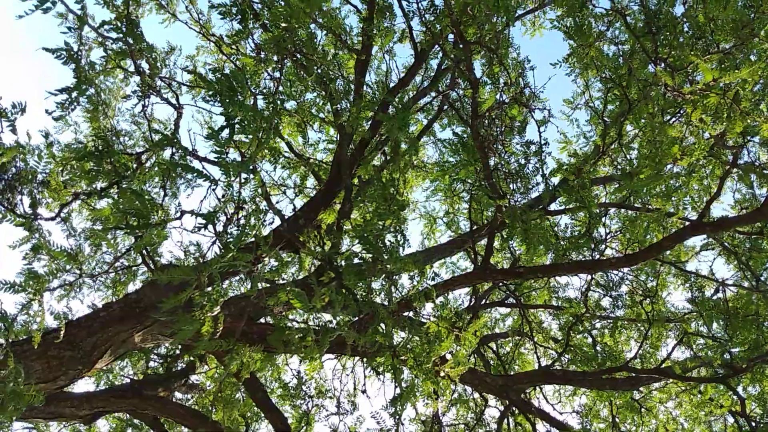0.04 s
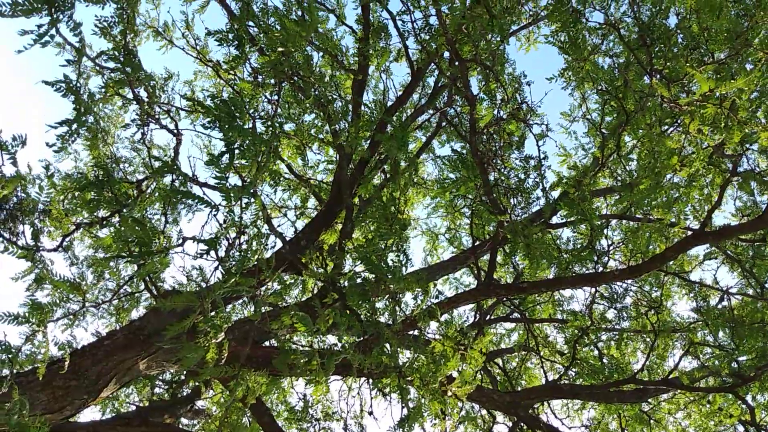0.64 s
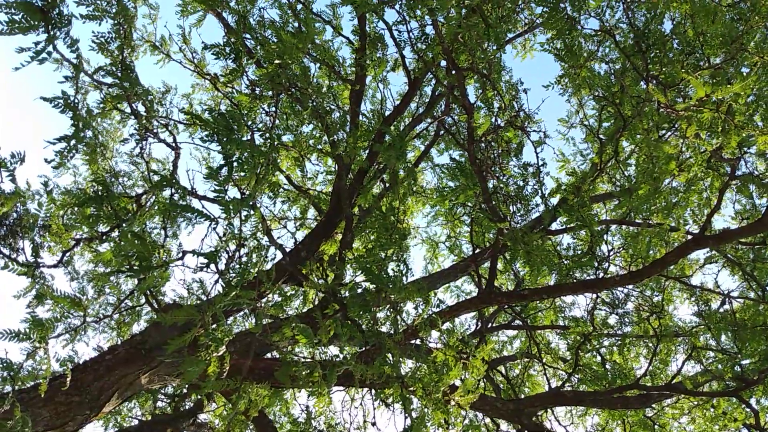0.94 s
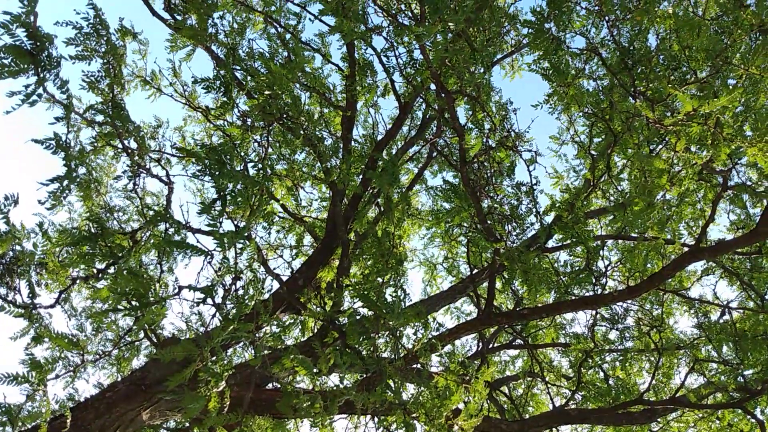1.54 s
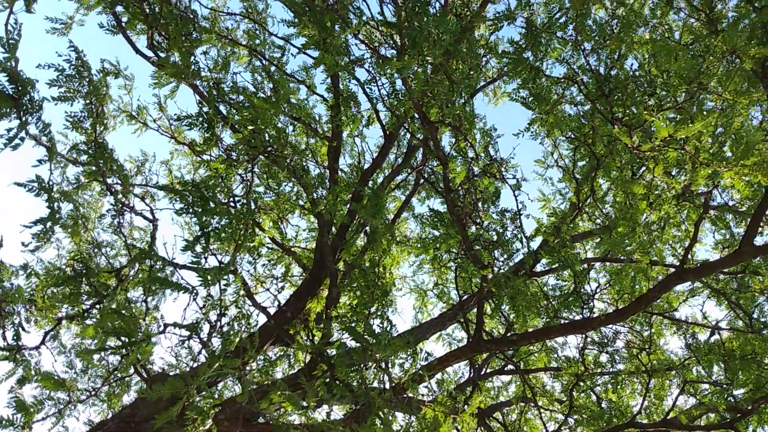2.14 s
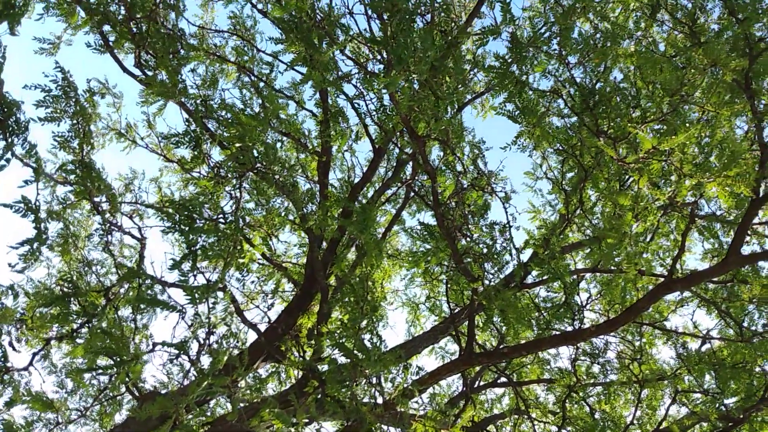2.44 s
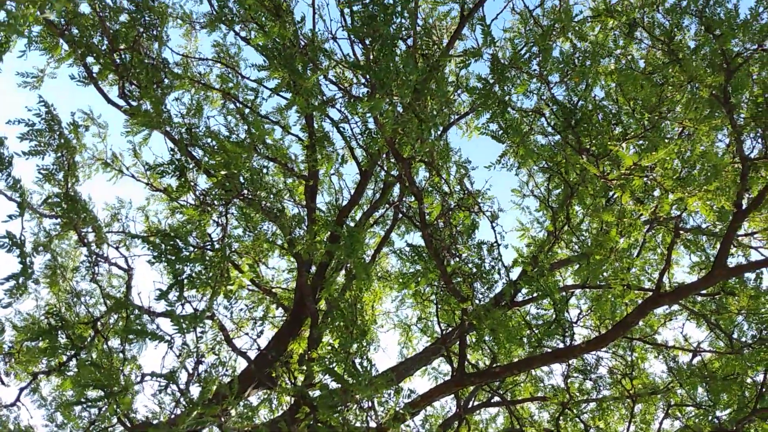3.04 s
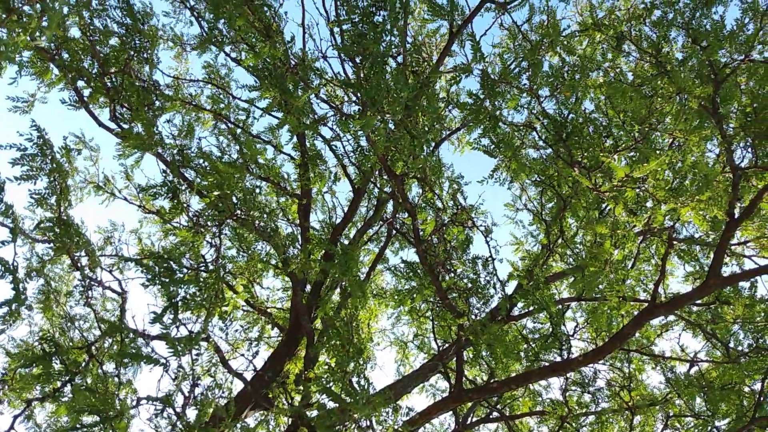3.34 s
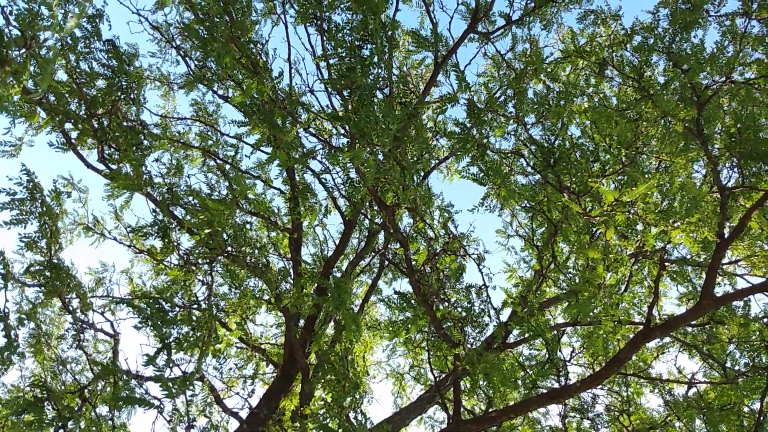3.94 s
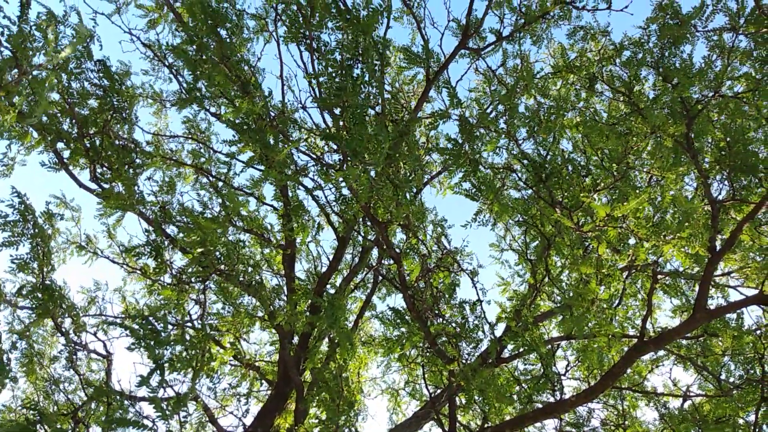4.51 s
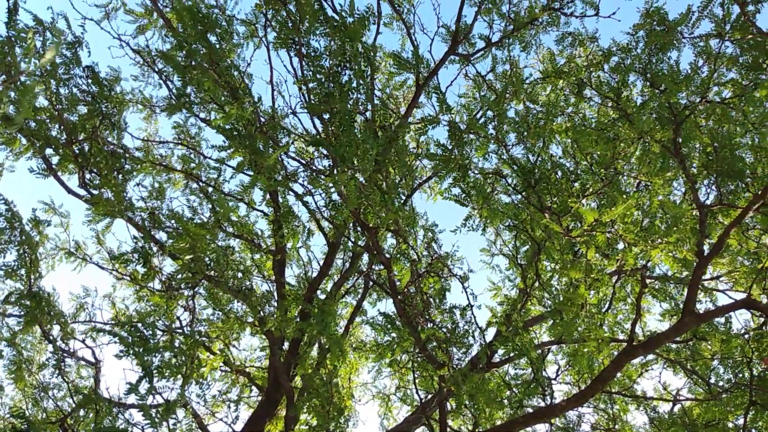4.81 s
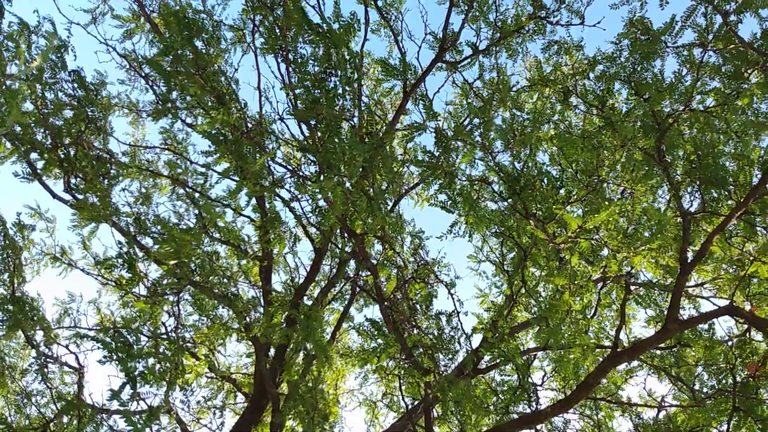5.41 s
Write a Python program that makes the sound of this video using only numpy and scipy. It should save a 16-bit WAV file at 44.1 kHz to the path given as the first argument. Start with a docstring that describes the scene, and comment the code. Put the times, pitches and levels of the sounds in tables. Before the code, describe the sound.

The sound is heard outdoors from beneath a tree. It opens quietly with a low wind rumble, a faint low electronic hum and the hiss of distant cicadas, while one cicada buzzes softly overhead, to the right, creeping up in level. At about 1.3 seconds this buzz swells, and the wind, hum and distant cicadas get louder together. By about 2.5 to 3 seconds the near cicada has reached a hard, bright, steady song, high and finely rasping, far louder than everything else. Its tone colour shifts from about 2 seconds on, as if the listener were moving among echoes from the branches. From about 3.6 seconds it slowly becomes a little quieter and duller, still buzzing at the end, around 5.5 seconds. A bird gives very faint, short chips, around 2, 3.5 and 4.7 seconds.

```python
"""Low wind, a faint low hum and the hiss of distant cicadas come first, under a soft buzz overhead. That buzz
is a cicada in a tree: it winds up, swells to a hard, steady song, holds it and eases a little. Its tymbals, two
ribbed drum skins, buckle about 180 times a second and make its abdomen ring; the buzz's peaks shift as the
listener moves among the echoes. Two more cicadas sing and a bird chips. Wind, hum and distant cicadas get
louder together as the microphone's gain comes up."""
import sys
import numpy as np
from scipy import signal
from scipy.fft import rfft, irfft, next_fast_len
from scipy.io import wavfile
from scipy.ndimage import map_coordinates

SR = 44100
rng = np.random.default_rng(int(sys.argv[2]) if len(sys.argv) > 2 else 0)


def wav_out(sig):
    """Save sig, one row per channel (or a flat mono array), as 16-bit PCM at SR to the path in sys.argv[1]."""
    wavfile.write(sys.argv[1], SR, np.round(np.clip(np.atleast_2d(sig).T, -1, 1) * 32767).astype(np.int16))


N = 250047
TOP_HZ = 15600  # the highest pitch heard
GAIN_AT_S, GAIN_RISE_S = 1.35, 0.29  # the background gets louder as the microphone's gain comes up


def amp(db):
    """Turns decibels into a number to multiply by."""
    return 10 ** (np.asarray(db) / 20)


def unit(x):
    """Scales a sound to an average (rms) strength of 1."""
    return x / np.sqrt(np.mean(x ** 2) + 1e-20)


def along(points, hz):
    """Reads a curve through (f/Hz, value) points, joined on a log pitch axis."""
    f, v = np.transpose(points)
    return np.interp(np.log(hz + 1), np.log(f + 1), v)


def lift(resonances, hz):
    """The dB that bell-shaped peaks and hollows add at each pitch."""
    return sum(db * np.exp(-((hz - centre) / width) ** 2) for centre, width, db in resonances)


def since(start_s):
    """Seconds gone by since a moment, 0 before it."""
    return np.maximum(np.arange(N) / SR - start_s, 0)


def ramp(start_s, length_s):
    """A straight climb from 0 to 1."""
    return np.minimum(since(start_s) / length_s, 1)


def swell(start_s, rise_s):
    """A rise from 0 that levels off towards 1."""
    return 1 - np.exp(-since(start_s) / rise_s)


def wobble(rate):
    """A smooth curve through `rate` random values a second."""
    return map_coordinates(rng.standard_normal(int(N * rate / SR) + 4), [np.arange(N) * rate / SR])


def filtered(x, response):
    """Scales and delays each pitch in x as response(hz) says."""
    size = next_fast_len(N + SR // 4)
    return irfft(rfft(x, size) * response(np.fft.rfftfreq(size, 1 / SR)), size)[..., :N]


def panned(x, balance):
    """Leans each pitch left or right by (f/Hz, left minus right/dB) points."""
    return filtered(x, lambda hz: amp(np.outer([.5, -.5], along(balance, hz))))


def pulses(rate_hz, jitter_s, scatter_db):
    """One sharp pulse a cycle, each slightly off in time and size."""
    cycle = np.cumsum(rate_hz) / SR
    at = np.interp(np.arange(1, int(cycle[-1])), cycle, np.arange(N))
    late, size = rng.standard_normal((len(at), 2)).T
    at = (at + late * jitter_s * SR)[:, None]
    # each pulse is drawn over 16 samples, so it can fall between two of them
    taps = np.floor(at).astype(int) + np.arange(-7, 9)
    shape = np.sinc(taps - at) * np.cos(np.pi * (taps - at) / 16) ** 2
    clicks = shape * amp(scatter_db * size)[:, None]
    return np.bincount(np.clip(taps, 0, N - 1).ravel(), clicks.ravel(), N)


def canopy(x, echo_s, sway_rate, paths=4):
    """Stereo echoes off leaves and branches; the paths take turns as they sway."""
    t = np.arange(SR // 4) / SR
    tails = rng.standard_normal((paths, 2, len(t))) * amp(-60 * t / echo_s)
    tails /= np.linalg.norm(tails, axis=-1, keepdims=True)
    shares = np.array([wobble(sway_rate) for _ in tails])
    shares /= np.sqrt(np.sum(shares ** 2, axis=0) + 0.47)
    echoes = (signal.oaconvolve(x[None], tail, axes=1)[:, :N] for tail in tails)
    return sum(share * echo for share, echo in zip(shares, echoes))


# how strong the wind is at each pitch: f/Hz, level/dB
WIND_TONE = [(24, -54), (40, -7), (72, 1), (100, -6.5), (126, -2), (177, -10), (202, -12.5), (239, -7.5),
             (268, -16), (349, -14), (508, -18), (1040, -19), (1460, -22.5), (2050, -29.5), (2980, -29),
             (3600, -34), (4680, -38), (7920, -120)]
# how alike it sounds on the left and right: f/Hz, likeness (1 = the same)
WIND_LIKENESS = [(60, 0.96), (150, 0.95), (300, 0.86), (600, 0.76), (1200, 0.13), (3000, 0)]


def wind():
    """Moving air rumbles softly, alike on both sides in the bass."""
    def tone(hz):
        angle = np.arccos(np.clip(along(WIND_LIKENESS, hz), -1, 1)) / 2
        return amp(along(WIND_TONE, hz)) * [np.cos(angle), np.sin(angle)]

    shared, opposite = filtered(rng.standard_normal((2, N)), tone)
    return unit(np.array([shared + opposite, shared - opposite])) * amp(0.47 * wobble(5.75))


# the two notes of the low hum: f/Hz, level against the wind/dB
HUM_NOTES = [(86.1, -14.5), (172.3, -14)]


def low_hum():
    """A faint, steady, low hum."""
    hum = np.zeros(N)
    for hz, db in HUM_NOTES:
        pitch_hz = hz + 1.22 * wobble(5)
        hum += amp(db) * unit(np.sin(2 * np.pi * np.cumsum(pitch_hz) / SR))
    return hum


# the low background leans left in the bass and right higher up: f/Hz, left minus right/dB
LOW_BALANCE = [(300, 1.5), (700, 1.5), (1400, -3), (3000, 0)]


def low_background(start_db=-66.5, gain_db=7.5):
    """Wind and hum, both louder once the microphone's gain comes up."""
    level_db = start_db + gain_db * swell(GAIN_AT_S, GAIN_RISE_S)
    return amp(level_db) * panned(wind() + low_hum(), LOW_BALANCE)


# the bird's faint calls: t/s, level/dB, f/Hz
BIRD_CHIPS = [(0.08, -84, 3300), (0.526, -80, 3370), (2.018, -74, 3360), (3.429, -72.5, 3400),
              (3.497, -77, 2980), (4.687, -74, 2930), (4.706, -69, 3420)]


def bird(width_s=0.0162, arch_hz=240):
    """Short ragged chips that arch up in pitch and fall, blurred by the trees."""
    t = np.arange(N) / SR
    chips = np.zeros(N)
    for start_s, db, hz in BIRD_CHIPS:
        from_peak = (t - start_s - width_s / 2) / width_s
        pitch_hz = hz - arch_hz * np.tanh(from_peak) ** 2 + 120 * wobble(400)
        chips += amp(db) * np.exp(-from_peak ** 2 / 2) * np.sin(2 * np.pi * np.cumsum(pitch_hz) / SR)
    return amp(-.5) * chips + amp(.5) * canopy(chips, echo_s=0.057, sway_rate=0.74)


# two cicadas each slow down once: first f/Hz, last f/Hz, middle of the drop t/s, its time scale/s
NEIGHBOUR_BEATS = [(201, 197, 3.0, .16), (189.4, 186.9, 2.07, .07)]
# one gets quieter as it slows, the other louder: level before/dB, level after/dB
NEIGHBOUR_LEVELS = [(-4.5, -12), (-16, -7)]
# the pitches at which they ring: f/Hz, width/Hz, boost/dB
NEIGHBOUR_PEAKS = [(4620, 60, 8.5), (5830, 80, 5.5), (6930, 87, 3.5), (8030, 93, 4), (8830, 42, 7.5),
                   (9170, 80, 8)]


def neighbours():
    """Two cicadas heard through the leaves, both beating faster than the near one."""
    pair = np.zeros((2, N))
    for beats, (first_db, last_db) in zip(NEIGHBOUR_BEATS, NEIGHBOUR_LEVELS):
        first_hz, last_hz, drop_at_s, drop_s = beats
        dropped = (1 + np.tanh((since(0) - drop_at_s) / (2 * drop_s))) / 2
        rate_hz = first_hz + (last_hz - first_hz) * dropped + 0.0812 * wobble(7)
        beat = pulses(rate_hz, jitter_s=3e-6, scatter_db=2.0)
        level_db = first_db + (last_db - first_db) * dropped + 1.34 * wobble(14)
        pair += amp(level_db) * unit(canopy(beat, echo_s=0.16, sway_rate=8, paths=6))
    return filtered(pair, lambda hz: amp(lift(NEIGHBOUR_PEAKS, hz)))


# how strong the distant cicadas are at each pitch: f/Hz, level/dB
DISTANT_TONE = [(2500, -50), (4300, -31), (4750, -21.5), (5300, -10.5), (5800, -9), (6900, -4), (7900, -5),
                (9100, -11), (10000, -11.5), (11700, -16), (12800, -24), (15500, -30)]


def distant_cicadas(start_db=-63, gain_db=8):
    """The two neighbours and a far chorus blurred to a hiss, a little to the right."""
    pair = neighbours()
    chorus = amp(-11.5 + .8 * wobble(12)) * rng.standard_normal((2, N))
    far = unit(filtered(pair + chorus, lambda hz: amp(along(DISTANT_TONE, hz))))
    level_db = start_db + gain_db * swell(GAIN_AT_S, GAIN_RISE_S)
    return amp(level_db + np.array([[-2.5], [2]])) * far


def buckling(hz, lasts_s=.0013, ripple_s=0.00034, ripple_hz=2250):
    """A tymbal's ribs give way one after another, so each pitch of a snap leaves at its own moment."""
    delay_s = lasts_s * (1 - hz / TOP_HZ) + ripple_s * np.sin(2 * np.pi * hz / ripple_hz)
    return np.exp(-2j * np.pi * np.cumsum(delay_s) * hz[1])


# the four snaps within one cycle: t/s, level/dB
CYCLE_SNAPS = [(0, 2), (.00105, -.6), (.0023, 2.2), (.00355, -0.1)]
# their rasp is strongest in the middle of the song's range: f/Hz, level/dB
RASP_TONE = [(4500, -20), (6000, -4), (7000, 0), (9000, -3), (12500, -12)]


def tymbals(wound_up, start_hz=176.8, song_hz=180, rasp_db=-20):
    """Two tymbals snap in and out once a cycle; the beat speeds up, quickly at first, then holds."""
    def four_snaps(hz, notch=0.15):  # notch, 0 to 1: how deeply the snaps cancel at some pitches
        total = sum(amp(db) * np.exp(-2j * np.pi * hz * delay_s) for delay_s, db in CYCLE_SNAPS)
        return total * (np.abs(total) + 1e-6) ** (notch - 1)

    rate_hz = start_hz + (song_hz - start_hz) * wound_up ** .52 + 0.0556 * wobble(20)
    beat = pulses(rate_hz, jitter_s=.7e-6, scatter_db=0.46)
    snaps = unit(filtered(beat, lambda hz: four_snaps(hz) * buckling(hz)))
    # the ribs never buckle twice alike: every snap carries a rasp of its own
    rasp = filtered(snaps * rng.standard_normal(N), lambda hz: amp(along(RASP_TONE, hz)))
    return snaps + amp(rasp_db) * rasp


# how strongly the abdomen sends out each pitch: f/Hz, level/dB
ABDOMEN_TONE = [(2000, -84), (3200, -33.5), (3900, -27.5), (4500, -21.5), (5200, -9), (7200, -1.23),
                (9000, -3), (10500, -6), (11700, -9), (13000, -14.5), (15500, -24.5)]
# peaks and hollows of abdomen and branches, heard throughout: f/Hz, width/Hz, boost/dB
STEADY_PEAKS = [(4420, 120, 7.5), (4650, 80, -5.5), (5230, 80, 4.5), (5610, 120, 9.8), (6350, 90, 8.1),
                (6880, 80, 3.4), (7170, 110, 6.7), (7700, 110, 8.0), (8460, 300, 5.4), (9020, 80, -4.2),
                (9170, 80, 7.4), (9840, 230, 8.1), (10850, 580, -2.6), (11690, 160, 7.4), (11870, 80, -6.4),
                (12480, 100, -7.3)]


def abdomen(snaps, colouring):
    """The snaps ring the abdomen, heard with one colouring from the echoes."""
    tone_db = lambda hz: along(ABDOMEN_TONE, hz) + lift(STEADY_PEAKS, hz) + lift(colouring, hz)
    return unit(filtered(snaps, lambda hz: amp(tone_db(hz))))


# six colourings in turn, where echoes add up or cancel: f/Hz, width/Hz, boost/dB
SWELLING_PEAKS = [(4510, 80, -15.3), (4680, 90, 8.5), (4860, 80, -14.1), (5020, 90, 5.9), (5860, 150, 15.9),
                  (6130, 80, -6.5), (6290, 80, 11.5), (6680, 1270, -8.7), (7010, 80, 12.4),
                  (9170, 130, -15.2), (9360, 90, 7.2), (9530, 80, -13.2), (10040, 200, -10.3),
                  (10800, 80, -7.9), (12570, 640, 10.8), (12790, 150, -11.3)]
CREST_PEAKS = [(4660, 780, -7.6), (5940, 90, 8.0), (6140, 150, -12.2), (6470, 90, -15.0), (7740, 80, -8.2),
               (8380, 320, -10.9), (8640, 80, 11.1), (8820, 90, -9.8), (9180, 130, -9.9), (9360, 80, 10.4),
               (9540, 90, -11.2), (9910, 160, -14.8), (10350, 300, 6.4), (12210, 150, 16.0),
               (12930, 100, 9.6), (13120, 90, -13.4)]
FULL_PEAKS = [(3920, 190, -8.5), (5100, 100, -14.9), (5950, 80, -10.6), (6250, 100, -7.8),
              (6760, 220, -9.4), (8060, 170, -16.0), (8840, 80, 6.1), (9000, 110, -8.6), (9330, 90, -5.5),
              (9720, 80, -5.0), (10600, 90, -7.4), (11160, 80, -7.1), (11890, 130, -12.9),
              (12240, 110, -12.2), (12990, 150, -10.0), (13650, 110, -14.8)]
HOLDING_PEAKS = [(4670, 80, -8.2), (5060, 80, -10.4), (5380, 110, -4.5), (5800, 200, -8.6),
                 (6680, 80, -10.1), (6840, 90, 3.1), (7000, 80, -8.3), (7530, 160, -3.4), (8720, 270, -6.4),
                 (9400, 90, -12.0), (10200, 130, -6.2), (10600, 160, -14.6), (11460, 570, -3.6),
                 (12490, 260, -11.5), (13250, 130, -16.0), (14050, 160, -6.1)]
EASING_PEAKS = [(4240, 360, -8.7), (5120, 100, 8.0), (5660, 230, -11.2), (6120, 80, -10.2),
                (6480, 80, -10.2), (7260, 130, -16.0), (7660, 140, -16.0), (8100, 80, -7.7),
                (8510, 100, -14.8), (8780, 90, -9.7), (9280, 120, -12.9), (10080, 300, -14.1),
                (11200, 210, -7.1), (12140, 100, -14.5), (12710, 220, -11.6), (14640, 110, -15.0)]
SETTLING_PEAKS = [(5040, 90, 9.4), (5390, 90, 8.6), (6140, 90, -10.1), (6300, 90, 5.9), (6480, 80, -15.3),
                  (6650, 90, 7.0), (7030, 90, 6.0), (7180, 80, -12.9), (7570, 80, -15.2), (8280, 80, 13.2),
                  (8580, 460, -7.2), (9010, 90, 10.2), (9180, 80, -12.9), (9730, 90, 5.1),
                  (10030, 180, -9.7), (14840, 100, 15.0)]
# the five fades from one colouring to the next: start t/s, length/s, level/dB
COLOUR_CHANGES = [(2.096, 0.19, 0.4), (2.39, .22, -.3), (3.5, 0.96, 0), (4.62, 0.26, -1),
                  (5.08, 0.32, 0.54)]


def shifting_colour(snaps):
    """The buzz's peaks shift as the listener moves among the echoes."""
    song = abdomen(snaps, SWELLING_PEAKS)
    colourings = [CREST_PEAKS, FULL_PEAKS, HOLDING_PEAKS, EASING_PEAKS, SETTLING_PEAKS]
    for (start_s, length_s, db), colouring in zip(COLOUR_CHANGES, colourings):
        song = song + ramp(start_s, length_s) * (amp(db) * abdomen(snaps, colouring) - song)
    return song


EASE_AT_S = 3.58  # from here the near song slowly gets quieter and duller


def brightness(song, wound_up, slack_db=-3.5, taut_db=2.5, dull_db_per_s=2):
    """Harder snaps are brighter: the treble grows as the tymbals wind up and dulls as they ease."""
    treble = filtered(song, lambda hz: along([(9500, 0.24), (11500, 0.63)], hz))
    treble_db = slack_db + (taut_db - slack_db) * wound_up - dull_db_per_s * since(EASE_AT_S)
    waver_db = 0.6 * wobble(13)
    return song + (amp(treble_db + waver_db) - 1) * treble


def effort(start_db=-70.5, creep_db_per_s=5.5, swell_at_s=1.28, full_db=-43, ease_db_per_s=1.5):
    """The near cicada's level in dB: it creeps up, swells to full song, holds and eases."""
    quiet_db = start_db + creep_db_per_s * np.minimum(since(0), swell_at_s)
    swell_db = (full_db - quiet_db) * swell(swell_at_s, rise_s=0.57)
    return quiet_db + swell_db - ease_db_per_s * since(EASE_AT_S) + 0.084 * wobble(5.1)


def near_branches(hz, lead_radians=1.6, ripple_hz=1130):
    """Nearby branches put the left side ahead of the right at some pitches, behind at others."""
    lead = lead_radians * np.tanh(4 * np.sin(2 * np.pi * hz / ripple_hz))
    return np.array([np.exp(1j * lead), np.ones(len(hz))])


# the near cicada sits to the right; only its highest pitches lean left: f/Hz, left minus right/dB
CICADA_BALANCE = [(4000, -10), (5600, -9), (7200, -10.5), (9000, -5), (11500, -10), (13500, 3.5)]


def cicada():
    """The cicada overhead: tymbals ring its abdomen, and the buzz comes down through the tree."""
    wound_up = ramp(0, length_s=2.8)
    snaps = tymbals(wound_up)
    song = brightness(shifting_colour(snaps), wound_up)
    direct = filtered(song, near_branches)
    # moving leaves make every overtone flutter on its own, most on the shaded left side
    leaves = amp([[-5], [-17]]) * canopy(song, echo_s=0.16, sway_rate=9, paths=8)
    return amp(effort()) * unit(panned(direct + leaves, CICADA_BALANCE))


def scene():
    """Everything heard from under the tree."""
    return cicada() + distant_cicadas() + low_background() + bird()


def record(dry):
    """Cuts the deepest bass, below about 31 Hz, and everything above TOP_HZ."""
    return filtered(dry, lambda hz: (hz < TOP_HZ) * (1 - 1 / (1 + (hz / 31) ** 4)))


dry = scene()
out = record(dry)
wav_out(out)
```